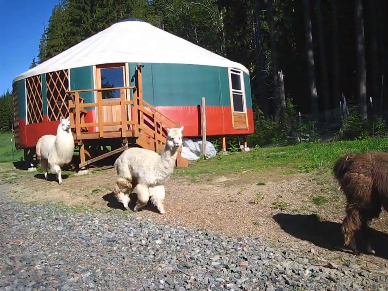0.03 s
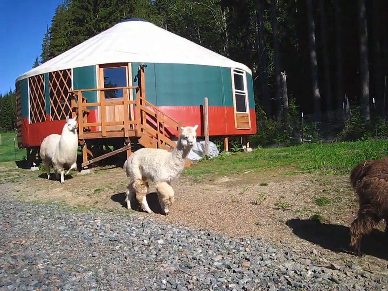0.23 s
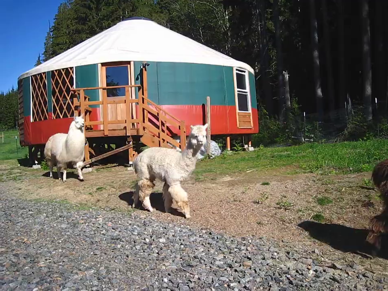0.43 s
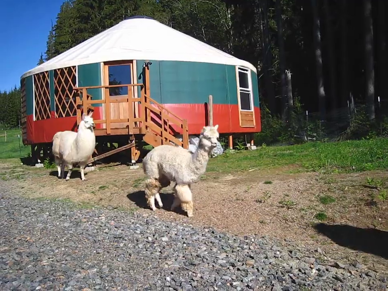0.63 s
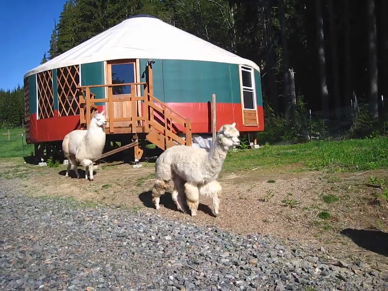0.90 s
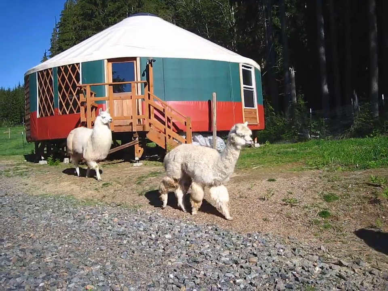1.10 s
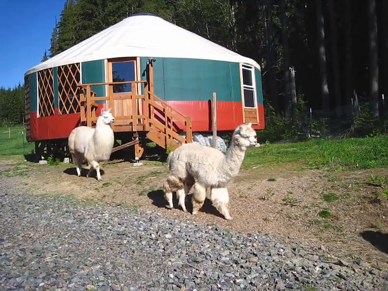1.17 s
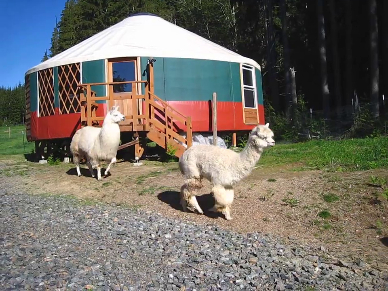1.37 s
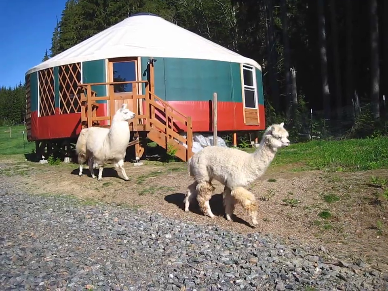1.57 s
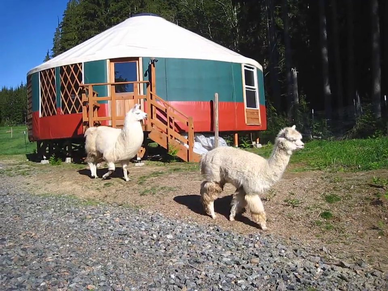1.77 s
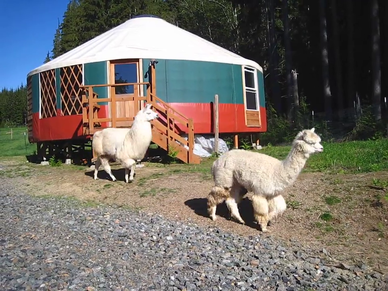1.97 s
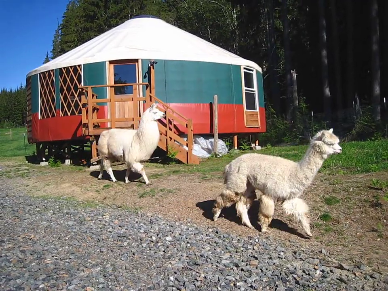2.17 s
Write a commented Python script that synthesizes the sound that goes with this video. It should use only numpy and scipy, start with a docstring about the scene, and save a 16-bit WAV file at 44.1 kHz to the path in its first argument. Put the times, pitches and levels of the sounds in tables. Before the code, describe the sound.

Gravel crunching and clicking under the uneven steps of alpacas, with faint wind behind.

```python
"""Gravel crunching under alpacas and a person on a slope in still, open country.
Each footfall or shuffle presses out a swell of tiny collisions: pebbles, duller packed soil, fine grit.
Single stones snap against each other; loose ones ring briefly. The nearby ground and a forest edge
reflect the sound, and light wind hushes behind."""
import sys
import numpy as np
from scipy import signal
from scipy.fft import rfft, irfft
from scipy.io import wavfile

SR = 44100
rng = np.random.default_rng(int(sys.argv[2]) if len(sys.argv) > 2 else 0)


def log_audio(samples):
    """Write samples as a 16-bit WAV file to the path given in sys.argv[1]."""
    # one column per channel
    frames = np.atleast_2d(samples).T
    # limit to full scale, then quantise
    limited = np.clip(frames, -1, 1)
    pcm = np.round(limited * 32767).astype(np.int16)
    wavfile.write(sys.argv[1], SR, pcm)


N = 99225

# wind spectrum: freq_hz, density_db
WIND_SPECTRUM = [(15, -12), (28, -6.5), (72, 1.5), (110, -3), (190, -3.5), (350, 0.5), (650, 0), (1000, -1),
                 (1400, -7), (3000, -10.5), (5000, -11.5), (9000, -18.5), (15500, -21.5)]
# touches of the large rocking stone: start_s, level_db
ROCKING_TOUCHES = [(0.2597, -34), (0.2626, -26.5), (0.2707, -35.5)]
# its modes: freq_hz, gain_db, t60_s
ROCKING_MODES = [(190, -2.5, 0.011), (975, -17.5, .05), (1652, -1.5, 0.059), (2520, -2, 0.035),
                 (3020, -13, 0.034), (3940, 5.5, 0.033), (5300, 2, .03)]
# one-note clinks and knocks of loose stones: start_s, level_db, pitch_hz, t60_s
STONE_CLINKS = [(.3070, -32.5, 1600, .02), (.5240, -35, 920, 0.014), (.5380, -45, 440, .04),
                (0.6138, -36, 2410, 0.025), (1.4994, -30.5, 1090, .024), (1.9937, -18.5, 870, 0.0061),
                (2.0015, -26.5, 1600, 0.014), (2.0015, -20, 4230, .007), (2.0015, -16, 7100, 0.0067)]
# stones snapping together: start_s, level_db, pitch_hz
STONE_SNAPS = [ (0.038, -31.5, 10800), (.1673, -32.5, 2780), (0.1939, -21.5, 5430), (0.207, -14, 3930),
               (0.2612, -12, 3240), (.2627, -0.5, 4700), (.2638, -13.5, 2780), (0.27, -30, 5200),
               (0.2725, -23, 4000), (0.3056, -27, 3200), (0.3075, -22.5, 3200), (0.3528, -38, 6130),
               (.3791, -31.5, 4370), (.4410, -32, 3900), (.5333, -37, 3750), (.6669, -17, 5450),
               (0.7293, -33, 4900), (0.7515, -24.5, 9700), (0.7545, -24, 6500), (0.7603, -22.5, 3150),
               (.7630, -18, 4400), (0.7703, -18.5, 3600), (0.7758, -16, 4800), (0.7778, -15.5, 5000),
               (0.7849, -15.5, 4650), (0.7906, -17.5, 4300), (0.7952, -21, 4400), (0.8305, -16, 4500),
               (0.8676, -26, 5200), (0.8852, -18.5, 4340), (.8870, -21, 4150), (0.8919, -21, 4400),
               (.9248, -27, 4750), (0.9454, -19, 4230), (.9548, -25, 4200), (1.0484, -19.5, 8000),
               (1.065, -31, 11000), (1.1100, -32, 11100), (1.148, -27.5, 10000), (1.164, -20, 10100),
               (1.1660, -23, 10700), (1.2110, -25, 4370), (1.2267, -34, 2960), (1.2700, -27.5, 9000),
               (1.288, -18.5, 10400), (1.3118, -22, 4400), (1.3912, -25, 3300), (1.4453, -24.5, 3900),
               (1.4729, -20, 7200), (1.4870, -22, 5700), (1.4995, -24, 1660), (1.5106, -20.5, 4070),
               (1.6580, -30.5, 3230), (1.7408, -28, 4800), (1.7452, -28, 5400), (1.7834, -11.5, 4650),
               (1.8086, -23.5, 4100), (1.8183, -31.5, 2520), (1.8330, -14, 6200), (1.838, -17, 4700),
               (1.8586, -22, 3920), (1.862, -22, 6340), (1.8687, -15.5, 11000), (1.8781, -30, 5300),
               (1.8886, -21.5, 4800), (1.9385, -18.5, 9100), (1.9506, -16.5, 4830), (1.9857, -19, 5960),
               (1.9938, -21, 6000), (2.0015, -13.5, 6900), (2.0014, -9, 9640), (2.0017, -11, 4140),
               (2.0667, -19.5, 3630), (2.15, -28, 12200), (2.175, -28.5, 11100), (2.1642, -30.5, 3700),
               (2.1885, -29, 4060), (2.2329, -24, 9000), (2.2380, -23.5, 4900)]
# modes of a snapping stone: pitch_ratio, gain_db, t60_cycles
SNAP_MODES = [(.48, -21.5, 11), (1.0, 4, 7.5), (1.15, -15.5, 13.5), (2.3, -21, 19)]
# grain spectra of pebbles, soil and grit: freq_hz, density_db
PEBBLE_SPECTRUM = [(1200, -39), (1700, -6), (2400, -5), (3300, -7), (4800, 3.5), (6200, -4), (8000, -19.5),
                   (12000, -23)]
SOIL_SPECTRUM = [(250, -11.5), (550, -11.5), (1000, -2.5), (1700, 1), (2600, -4), (3600, -3)]
GRIT_SPECTRUM = [(5500, -8), (7500, -4), (9000, -7.5), (11000, 0.5), (13000, -8.5), (15500, -10)]
# footfalls and shuffles: crest_s, level_db, rise_s, fall_s, soil_offset_db, grit_offset_db
FOOTFALLS = [ (.160, -47.5, 0.072, .06, -1.5, -10), (0.207, -40, 0.029, 0.048, -1, -7),
             (0.239, -46, 0.021, 0.071, 7.5, -22), (0.261, -33.5, 0.0057, 0.028, -2.5, -5),
             (.307, -38.5, 0.012, 0.017, 2, -8.5), (.345, -53, 0.033, 0.19, -0.5, -2.5),
             (.530, -52.5, 0.019, .04, 4.5, -16), (0.551, -47, 0.029, 0.022, -12, -4),
             (0.613, -47, 0.031, 0.04, -2, -20), (.675, -47.5, 0.016, 0.081, -12, -14),
             (.729, -50.5, 0.01, 0.018, 7, -20), (0.78, -34.3, 0.037, 0.071, -4.5, -30),
             (0.819, -40.5, 0.012, 0.014, -7, -12), (.840, -43, 0.014, 0.096, -7.5, -10),
             (0.886, -38, 0.015, 0.041, -9, -25), (.922, -39.5, 0.01, 0.015, 1, -28),
             (.956, -46.5, 0.022, 0.073, -2.5, -8), (1.041, -48.5, 0.051, 0.045, -0.5, -10),
             (1.164, -51.5, 0.0054, 0.0085, -17, 15), (1.209, -41, .008, 0.052, -10, -21),
             (1.232, -47.5, .02, .05, -7, -11), (1.289, -46.5, .005, 0.023, -5, -0.5),
             (1.317, -37.5, 0.025, 0.05, -6.5, -9), (1.365, -47, 0.036, .06, -5, -5.5),
             (1.394, -41.5, 0.036, 0.09, -2.5, -11), (1.485, -40.5, 0.076, 0.055, -8.5, -11),
             (1.503, -38.5, 0.025, 0.079, -3.5, -9.5), (1.570, -49.5, 0.039, 0.12, -6, -7.5),
             (1.662, -50.5, 0.016, 0.019, -5, -10), (1.738, -43.5, 0.076, 0.11, -2.5, -14),
             (1.805, -42, 0.058, 0.1, -6, -18), (1.836, -42.5, 0.022, 0.043, -10, -4),
             (1.861, -39.5, 0.0052, 0.067, -12, -10), (1.956, -44.5, 0.084, 0.095, -1.5, -5.5),
             (2.005, -39.5, 0.029, 0.037, 2, -0.5), (2.040, -37, 0.012, 0.015, -2, -6),
             (2.055, -36.5, 0.0063, 0.013, 6, -18), (2.064, -43.5, .01, 0.079, 4.5, -5.5),
             (2.095, -58.5, 0.031, .07, 4, 3), (2.145, -55, 0.058, 0.077, 5.5, -14),
             (2.240, -45, 0.011, 0.077, -5, -3)]

WIND_DB, WIND_WAVER_DB = -52.5, 0.1
GROUND_DB, GROUND_T60_S = -11.5, 0.033
FOREST_DB, FOREST_T60_S = -17.5, 0.34
REFLECTION_LOWPASS_HZ, ROLLOFF_HZ, CUTOFF_HZ = 5700, 14050, 16000
RING_RISE_S = 0.00057
SNAP_DB, SNAP_RISE_CYCLES, SNAP_MODE_SPREAD_DB = -0.53, 0.48, 3.3
CRACK_DB, CRACK_DECAY_S = -15, 0.00054
GRAINS_PER_S, GRAIN_SPREAD_DB, GRAIN_T60_CYCLES = 4200, 4.5, 9.9
GRIT_PER_S, GRIT_SPREAD_DB = 1700, 3.5
PEBBLE_DB, SOIL_DB, GRIT_DB = -0.5, -2, 1.5
PEBBLE_FLOOR_DB, GRIT_FLOOR_DB = -59, -63


def from_db(db):
    """Decibels to gain."""
    return 10 ** (np.asarray(db) / 20)


def unit_rms(x):
    """Scale to rms 1."""
    return x / np.sqrt(np.mean(x ** 2) + 1e-20)


def gain_at(spectrum, hz):
    """Spectrum gain, interpolated in dB over log frequency."""
    freq_hz, density_db = np.transpose(spectrum)
    return from_db(np.interp(np.log(hz + 1e-9), np.log(freq_hz), density_db))


def add(out, start_s, sound):
    """Mix sound into out at start_s."""
    i = int(start_s * SR)
    out[i:i + len(sound)] += sound[:N - i]


def wind():
    """Light wind in the trees: a soft, near-steady hush."""
    hz = np.arange(N // 2 + 1) * SR / N
    hush = irfft(rfft(rng.standard_normal(N)) * gain_at(WIND_SPECTRUM, hz), N)
    waver = np.interp(np.arange(N), np.linspace(0, N, 12), rng.standard_normal(12))
    return from_db(WIND_DB + WIND_WAVER_DB * waver) * unit_rms(hush)


def reflections(x, t60_s):
    """Diffuse reflections: a dulled, decaying noise tail."""
    t = np.arange(SR // 2) / SR
    tail = rng.standard_normal(len(t)) * from_db(-60 * t / t60_s)
    lowpass = signal.butter(2, REFLECTION_LOWPASS_HZ, fs=SR, output="sos")
    tail = signal.sosfilt(lowpass, tail / np.linalg.norm(tail))
    return signal.fftconvolve(x, tail)[:N]


def stone_ring(level_db, hz, t60_s):
    """One mode of a ringing stone: a soft, quick onset, then a decay."""
    t = np.arange(SR // 10) / SR
    rise = 1 - np.exp(-t / RING_RISE_S)
    return from_db(level_db - 60 * t / t60_s) * rise * np.sin(2 * np.pi * hz * t)


def loose_stones():
    """A large stone rocks underfoot, ringing at each touch; others clink or knock once."""
    out = np.zeros(N)
    for start_s, level_db in ROCKING_TOUCHES:
        for hz, gain_db, t60_s in ROCKING_MODES:
            add(out, start_s, stone_ring(level_db + gain_db, hz, t60_s))
    for start_s, level_db, pitch_hz, t60_s in STONE_CLINKS:
        add(out, start_s, stone_ring(level_db, pitch_hz, t60_s))
    return out


def stone_snaps():
    """A stone slips and hits its neighbour: a few heavily damped cycles plus a rough crack."""
    out = np.zeros(N)
    t = np.arange(SR // 50) / SR
    for start_s, level_db, pitch_hz in STONE_SNAPS:
        cycles = t * pitch_hz
        tone = 0
        for ratio, gain_db, t60_cycles in SNAP_MODES:
            in_band = pitch_hz * ratio < CUTOFF_HZ
            mode_db = gain_db + rng.normal(0, SNAP_MODE_SPREAD_DB)
            envelope = from_db(mode_db - 60 * cycles * ratio / t60_cycles)
            tone += in_band * envelope * np.sin(2 * np.pi * cycles * ratio)
        tone *= 1 - np.exp(-(cycles / SNAP_RISE_CYCLES) ** 2)
        tone /= np.abs(tone).max()
        band_hz = np.minimum([0.4 * pitch_hz, 1.12 * pitch_hz], CUTOFF_HZ)
        bandpass = signal.butter(2, band_hz, "band", fs=SR, output="sos")
        noise = unit_rms(signal.sosfilt(bandpass, rng.standard_normal(len(t))))
        crack = from_db(CRACK_DB) * noise * np.exp(-t / CRACK_DECAY_S)
        add(out, start_s, from_db(level_db + SNAP_DB) * (tone + crack))
    return out


def grains(spectrum, rate_per_s, spread_db, size_count=18):
    """Random tiny collisions, each ringing a few cycles at the pitch of its grain size; rms 1."""
    hits = rng.random(N) < rate_per_s / SR
    strength = from_db(spread_db * np.minimum(rng.exponential(1, N), 3.5))
    impulses = hits * strength * rng.choice([-1, 1], N)
    size_index = rng.integers(0, size_count, N)
    out = np.zeros(N)
    for k, hz in enumerate(np.geomspace(spectrum[0][0], spectrum[-1][0], size_count)):
        radius = from_db(-60 * hz / (GRAIN_T60_CYCLES * SR))
        resonator = [1, -2 * radius * np.cos(2 * np.pi * hz / SR), radius ** 2]
        ringing = signal.lfilter([1, 0, -1], resonator, impulses * (size_index == k) + 1e-18)
        out += unit_rms(ringing) * gain_at(spectrum, hz) * np.sqrt(hz)  # bandwidth grows with pitch
    return unit_rms(out)


def crunches():
    """Each foot loads the gravel and lets it settle; rise_s and fall_s each span 20 dB."""
    t = np.arange(N) / SR
    pebble_power, soil_power, grit_power = from_db(PEBBLE_FLOOR_DB) ** 2, 0, from_db(GRIT_FLOOR_DB) ** 2
    for crest_s, level_db, rise_s, fall_s, soil_offset_db, grit_offset_db in FOOTFALLS:
        load = from_db(level_db - 20 * np.maximum((crest_s - t) / rise_s, (t - crest_s) / fall_s))
        pebble_power += load ** 2
        soil_power += (load * from_db(soil_offset_db)) ** 2
        grit_power += (load * from_db(grit_offset_db)) ** 2
    pebbles = np.sqrt(pebble_power) * grains(PEBBLE_SPECTRUM, GRAINS_PER_S, GRAIN_SPREAD_DB)
    soil = np.sqrt(soil_power) * grains(SOIL_SPECTRUM, GRAINS_PER_S, GRAIN_SPREAD_DB)
    grit = np.sqrt(grit_power) * grains(GRIT_SPECTRUM, GRIT_PER_S, GRIT_SPREAD_DB)
    return from_db(PEBBLE_DB) * pebbles + from_db(SOIL_DB) * soil + from_db(GRIT_DB) * grit


def scene():
    """Gravel underfoot, ground and forest-edge reflections, wind; mono."""
    gravel = crunches() + stone_snaps() + loose_stones()
    ground = from_db(GROUND_DB) * reflections(gravel, GROUND_T60_S)
    forest = from_db(FOREST_DB) * reflections(gravel, FOREST_T60_S)
    return (gravel + ground + forest + wind())[None]


def record(dry):
    """Microphone treble roll-off, then a steep low-pass."""
    dulled = signal.sosfilt(signal.butter(2, ROLLOFF_HZ, fs=SR, output="sos"), dry)
    return signal.sosfilt(signal.ellip(10, 0.2, 75, CUTOFF_HZ, fs=SR, output="sos"), dulled)


dry = scene()
out = record(dry)
log_audio(out)
```